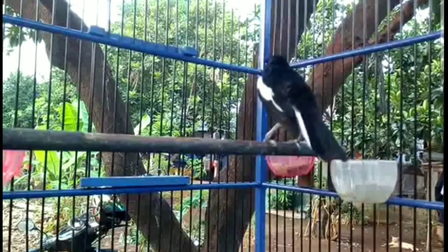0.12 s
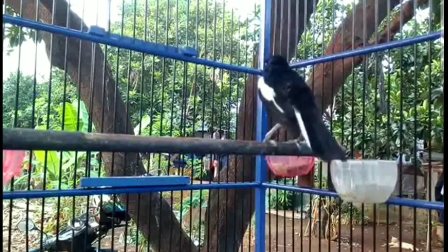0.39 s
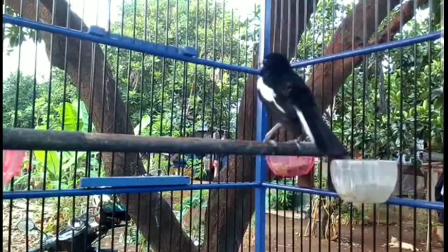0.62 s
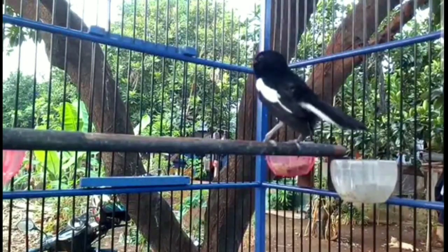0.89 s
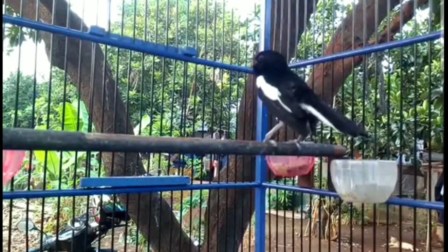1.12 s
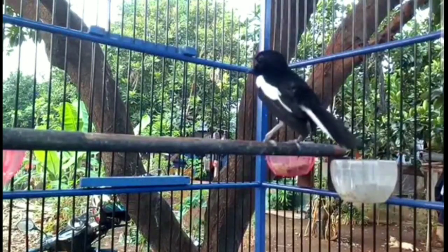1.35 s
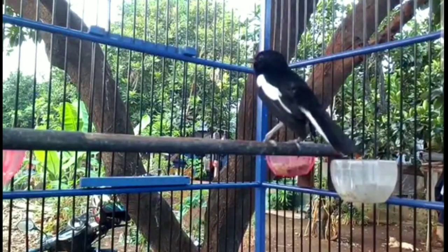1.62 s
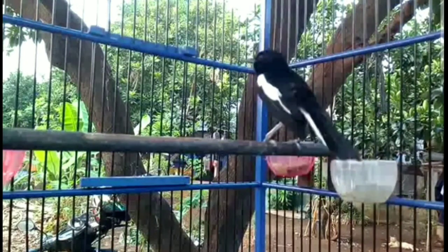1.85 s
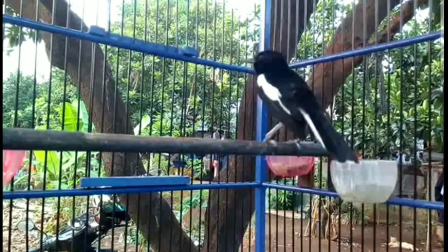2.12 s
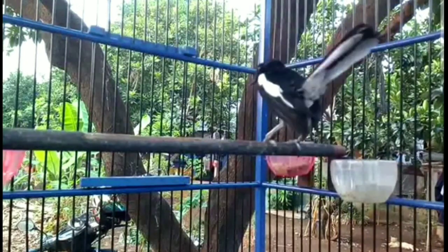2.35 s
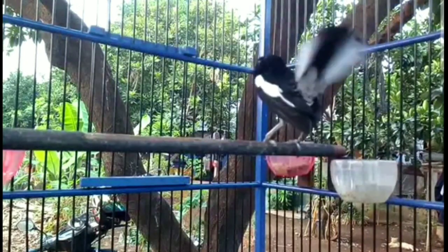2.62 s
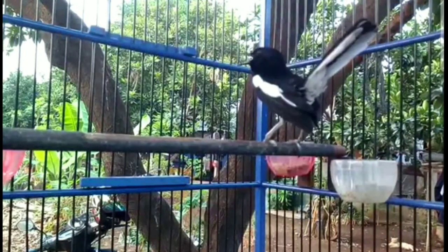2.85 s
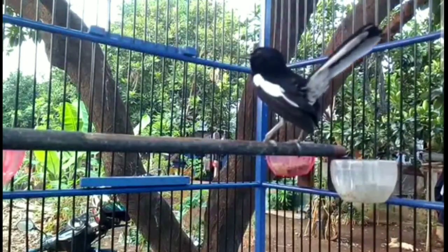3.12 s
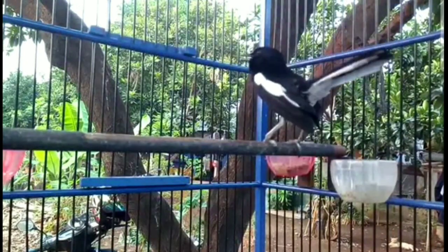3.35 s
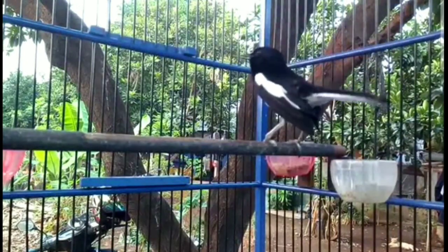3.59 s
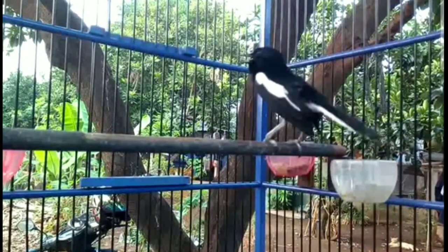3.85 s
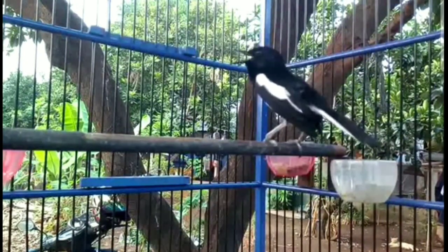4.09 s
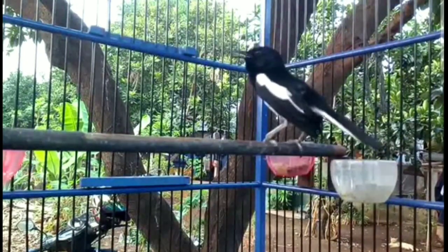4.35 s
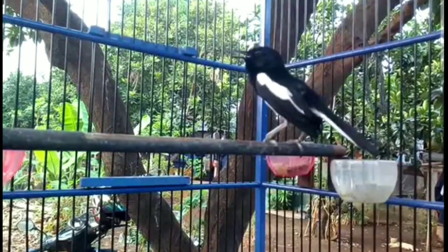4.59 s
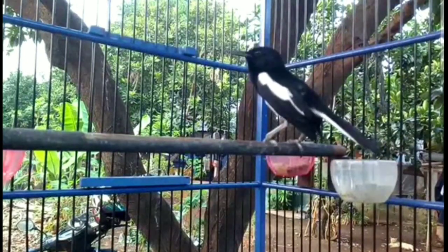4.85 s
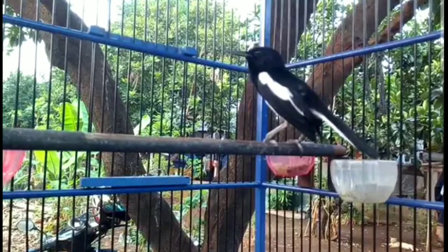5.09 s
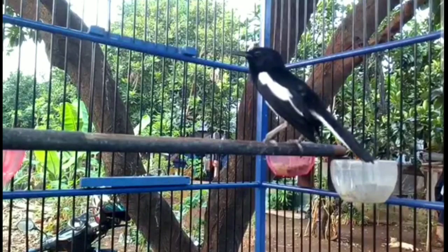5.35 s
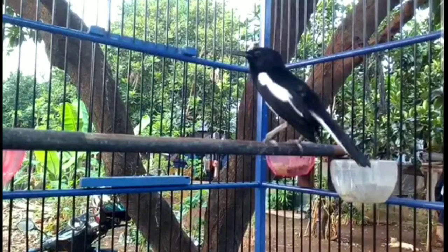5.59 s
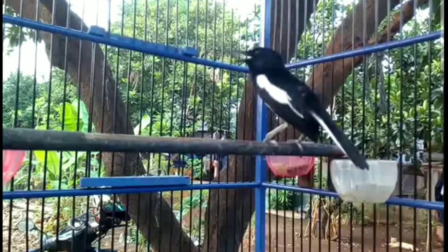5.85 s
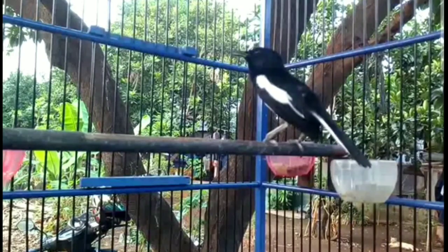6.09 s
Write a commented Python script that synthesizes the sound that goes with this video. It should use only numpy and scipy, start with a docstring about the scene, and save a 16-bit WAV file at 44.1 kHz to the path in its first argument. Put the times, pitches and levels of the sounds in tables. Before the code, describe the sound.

A caged songbird close by sings clear sliding whistles, scratchy chattering warbles and throbbing buzzes in short phrases, while fainter birds chip in a leafy yard.

```python
"""Caged songbird and yard birds

A caged songbird close to the microphone sings clear whistles, quick chattering warbles, a trill
and two-voiced buzzes: gliding sines roughened by random modulation, with rough scraps between.
Other birds whistle, call hoarsely and chip further off: fainter glides with decaying random echoes;
two short broadband clicks open chips. Beneath lie a low outdoor rumble and the hiss of a small
microphone, both shaped random spectra, and a faint steady ticking of short damped pulses."""
import sys
import numpy as np
from scipy import signal
from scipy.fft import rfft, irfft
from scipy.io import wavfile
from scipy.ndimage import uniform_filter1d

SR = 44100
rng = np.random.default_rng(int(sys.argv[2]) if len(sys.argv) > 2 else 0)


def invert_db(x):
    """Field ratio 10**(x/20) for x, a level in decibels (scalar or array-like)."""
    u = np.asarray(x, float) / 20
    return 10 ** u


def put_to_file(sound):
    """Save the sound as 16-bit audio at rate SR, in the file named by the first command-line argument."""
    columns = np.atleast_2d(sound).T  # one column per channel
    safe = np.clip(columns, -1, 1)
    whole_steps = np.round(safe * 32767)
    wavfile.write(sys.argv[1], SR, whole_steps.astype(np.int16))


N = 273861

# throbbing two-voiced buzzes, the first already ending:
# start t/s, end t/s, strength/dB, pitch factor, throb period t/s
BUZZES = [(-.17, .045, -10.5, 1.07, .029), (2.865, 3.107, -0.5, 0.99, .0292),
          (5.986, 6.179, -1.5, 1.02, .0268)]


def evened(x):
    """Normalization: scales a signal to rms 1."""
    return x / np.sqrt(np.mean(abs(x) ** 2) + 1e-20)


def read(points, hz):
    """Linear interpolation of a curve on a log-frequency axis."""
    f, value = np.transpose(points)
    return np.interp(np.log(hz + 1), np.log(f + 1), value)


def coloured(x, points):
    """Linear filtering: multiplies the spectrum by a gain curve in dB."""
    hz = np.fft.rfftfreq(len(x), 1 / SR)
    return irfft(rfft(x) * invert_db(read(points, hz)), len(x))


def waver(count, width):
    """Low-pass noise: random unsteadiness of rms 1 that holds for about width samples."""
    once = uniform_filter1d(rng.standard_normal(count), round(width))
    return evened(uniform_filter1d(once, round(width)))


def add(mix, s, sound):
    """Superposition: adds a sound at time s; what lies before zero is dropped."""
    at = round(s * SR)
    sound = sound[max(-at, 0):]
    part = mix[max(at, 0):][:len(sound)]
    part += sound[:len(part)]


def spread(rows):
    """Interpolated control curves: time, a 2 ms fade at both ends, and each column per sample."""
    s, *columns = np.transpose(rows)
    t = np.arange(s[0], s[-1], 1 / SR)
    fade = np.clip(np.minimum(t - t[0], t[-1] - t) / .002, 0, 1)
    curves = (uniform_filter1d(np.interp(t, s, c), size=40, mode="nearest") for c in columns)
    return t, fade, *curves


def angle(hz):
    """Phase is the running integral of frequency."""
    return 2 * np.pi * np.cumsum(hz) / SR


def tone(phase, db):
    """A sinusoid's peak is the square root of two times its rms level."""
    return np.sqrt(2) * invert_db(db) * np.cos(phase)


def breaks(t):
    """Amplitude modulation: Gaussian level changes, mostly brief dips where the voice breaks off."""
    # centre t/s, width t/s, level change/dB
    pauses = [(.466, 0.0044, -22), (0.772, 0.0066, -14), (6.034, 0.012, -5), (3.092, 0.005, -2),
              (1.463, 0.0063, 0), (4.218, 0.032, -1.5), (4.258, .005, -3), (4.267, 0.0033, -2),
              (4.468, 0.0097, -6), (4.489, 0.0073, 0.5), (4.704, 0.0069, -9), (4.732, 0.0047, -13),
              (4.643, .006, 0), (.669, .008, -10), (0.702, 0.0017, 0), (0.742, 0.0071, -18),
              (.751, 0.0049, -14), (.76, 0.007, -14), (0.948, 0.0026, -9), (0.954, 0.0024, -3),
              (1.175, 0.002, -2.5), (1.232, 0.0015, -16), (1.526, 0.0043, -8), (3.887, .008, -8),
              (4.561, 0.0081, -19), (4.767, 0.0028, -5), (4.79, 0.004, 0)]
    return sum(db * np.exp(-(2 * (t - s) / length) ** 2) for s, length, db in pauses)


def air():
    """Filtered Gaussian noise: rumble and hiss from random short-time spectra with drifting patches."""
    # spectral shape of rumble and hiss: f/Hz, relative density/dB
    spectrum = [(20, -49), (35, -14.5), (60, 2), (110, -3), (400, -13), (1300, -20), (4200, -24.5),
                (7300, -26.5), (16000, -26)]
    frames, hz = N // 1024 + 5, np.fft.rfftfreq(4096, 1 / SR)
    a, b, patches = rng.standard_normal((frames, 2049, 3)).T
    patches = uniform_filter1d(patches, size=60, axis=0)  # over frequency
    patches = evened(uniform_filter1d(patches, size=5, axis=1))  # over time
    z = (a + 1j * b) * invert_db(read(spectrum, hz)[:, None] + 0.42 * patches)
    noise = signal.istft(z, nperseg=4096, noverlap=3072)[1][:N]
    return invert_db(-58.5) * evened(noise)


def throb(t):
    """A sawtooth clock: where the buzz throbs (1 or 0), and how far each throb has gone (0-1)."""
    held_s = .055  # a buzz opens on a held chord
    on, done = np.zeros(len(t)), np.zeros(len(t))
    for start, end, _, _, period in BUZZES:
        turns = (t - start - held_s) / period
        inside = (turns > 0) & (turns < (end - start - held_s) // period)
        on, done = on + inside, done + inside * (turns % 1)
    return on, done


def placed(shape, start, end, db, factor):
    """Scaling of a shared shape in time, strength and pitch; negative times count from the end."""
    s, hz, level_db, upper_db = np.transpose(shape)
    return np.c_[np.where(s < 0, end, start) + s, hz * factor, level_db + db, upper_db + db]


def buzz(low, high):
    """Nonlinear mixing of two voices: a low one with strong octave, a high one, combination tones."""
    out = np.zeros(N)
    t, fade, hz, db, octave_db = spread(low)
    on, done = throb(t)
    # the pitch climbs, then snaps back; the octave breaks off at each snap
    climb = uniform_filter1d(on * (np.sin(2.22 * done) - .6), size=150)
    gap = uniform_filter1d(on * np.exp(-done / 0.13), size=90)
    a = angle(hz * (1 + 0.0916 * climb + 0.013 * waver(len(t), 100)))
    db = db - 8 * climb + 3 * waver(len(t), 150)
    octave_db = octave_db - 14 * gap + breaks(t)
    low_voice = tone(a, db) + tone(2 * a, octave_db)
    low_voice += tone(3 * a, db - 14) + tone(4 * a, octave_db - 43.5)
    add(out, t[0], fade * low_voice)

    u, fade, high_hz, db, sum_db = spread(high)
    shake = 0.011 + 0.068 * throb(u)[0]  # the high voice turns hoarse during the throbs
    a, b = np.interp(u, t, a), angle(high_hz * (1 + shake * waver(len(u), 90)))
    mixed = tone(a + b, sum_db) + tone(2 * b, sum_db - 15)
    mixed += tone(2 * a + b, sum_db - 38) + tone(3 * a - b, sum_db - 20.5)
    add(out, u[0], fade * (tone(b, db) + mixed))
    return out


def buzzes():
    """Scaled repetition: rising chirps and throbbing buzzes share their two-voice shapes."""
    # rising chirp before a buzz: start t/s, strength/dB, pitch factor
    chirps = [(2.715, -2, 1.029), (5.841, -2.5, .97)]
    # low and high sides of a chirp: t/s from start, f/Hz, level/dB, octave or sum tone level/dB
    chirp_low = [(0, 1700, -54, -85), (.009, 1750, -49.5, -43.5), (.024, 2010, -52.5, -24),
                 (.034, 2040, -78, -33), (.042, 2180, -70, -31.5), (.053, 2080, -68, -54)]
    chirp_high = [(.025, 2594, -49, -84), (.039, 2886, -38, -96), (.054, 3130, -56, -86)]
    # both sides of a buzz: t/s from start (negative: from end), f/Hz, level/dB,
    # octave or sum tone level/dB
    buzz_low = [(0, 1754, -59, -56), (.012, 1895, -50, -33.5), (.021, 1792, -57, -43),
                (.051, 1720, -56.5, -53.5), (.064, 1898, -53, -33.5), (-.012, 1874, -55, -33.5),
                (-.001, 1810, -60.5, -54)]
    buzz_high = [(.003, 2820, -47, -76), (.013, 2586, -55, -47), (.02, 2280, -48, -32.5),
                 (.047, 2270, -52.5, -32.5), (.061, 2670, -54, -54), (-.02, 2550, -49.5, -70),
                 (-.003, 2560, -53, -57)]
    out = np.zeros(N)
    for s, *row in chirps:
        out += buzz(placed(chirp_low, s, s, *row), placed(chirp_high, s, s, *row))
    for row in BUZZES:
        out += buzz(placed(buzz_low, *row[:4]), placed(buzz_high, *row[:4]))
    return out


def turbulence(voice):
    """Amplitude modulation by noise puts sidebands around each tone, which the throat filters."""
    # throat resonance applied to the sidebands: f/Hz, gain/dB
    throat = [(1000, -32.5), (1600, -17), (3500, -5.5), (4100, 9), (4700, -9), (5500, -15), (7000, -2.5),
              (9000, -43)]
    # scratchy spells: start t/s, end t/s, modulation level ahead of the throat/dB
    hoarse = [(0, .06, -0.5), (0.447, .49, 1), (0.732, .8, -1), (0.827, 1.02, -4), (1.13, 1.3, -8),
              (1.406, 1.6, -5.5), (2.708, 2.826, -14.5), (2.881, 3.11, -10.5), (3.3, 3.427, -9.5),
              (4.719, 4.84, -9.5), (5.867, 5.896, -7.5), (5.98, 6.204, -8)]
    clear_db = -38  # modulation outside these spells
    shake_shape = [(0, -24.5), (300, 6.5), (700, 0), (1500, -8), (4000, -17.0), (9000, -62.5)]  # f/Hz, dB
    shake = evened(coloured(rng.standard_normal(N), shake_shape))
    t = np.arange(N) / SR
    rasp_db = clear_db + sum((db - clear_db) * ((t >= start) & (t < end)) for start, end, db in hoarse)
    return coloured(voice * shake * invert_db(uniform_filter1d(rasp_db, size=600)), throat)


def pip(start, length, db, from_hz, to_hz):
    """A linear glide under one arch: the course of a short note, 8 dB down at its ends."""
    u = np.linspace(0, 1, num=9)
    return np.c_[start + length * u, from_hz + (to_hz - from_hz) * u, db - 8 * (2 * u - 1) ** 4]


def ticking():
    """Damped impulses: a faint dull tick at a steady pace, each of its own size."""
    # steady pace: first t/s, end t/s, spacing t/s
    ticks = (.0735, 3.9, .08)
    out, u = np.zeros(N), np.arange(200) / SR / .00025  # time in quarter milliseconds
    for s, size in zip(np.arange(*ticks), rng.random(100)):
        add(out, s, invert_db(-44 + 7 * size) * (1 - u / 3) * u * np.exp(-u))
    return out


def glide(start, length, db, from_hz, to_hz, fade_db, rise=0.18):
    """A shaped glide: gains 9 dB over the share rise of its length, while it fades ever faster."""
    u = np.linspace(0, 1, num=12)
    shape_db = -9 * np.clip(1 - u / rise, 0, 1) + fade_db * u ** 2
    return spread(np.c_[start + length * u, from_hz + (to_hz - from_hz) * u, db + shape_db])


def smeared(row):
    """Fast random frequency and amplitude modulation smears a tone into a noisy band."""
    *course, shake_hz = row
    t, fade, hz, db = glide(*course, fade_db=-15.5, rise=0.53)
    a = angle(hz + shake_hz * waver(len(t), 40))
    return t[0], fade * tone(a, db + 4 * waver(len(t), 80))


def faint_notes():
    """Slow random modulation leaves far whistles tonal; fast modulation smears notes and clicks."""
    # far birds' short dying notes: start t/s, length t/s, level ahead of the mix/dB, from f/Hz, to f/Hz
    far_notes = [(2.19, 0.055, -70, 2230, 2270), (5.03, 0.067, -69.5, 2290, 2316),
                 (.078, 0.037, -72, 5050, 4500), (1.043, 0.11, -59, 3310, 3210),
                 (1.83, .06, -70, 2760, 2760), (1.912, 0.077, -66.5, 4240, 4070),
                 (2.175, 0.091, -57.5, 4320, 4560), (2.206, 0.063, -55, 3880, 4200),
                 (2.614, 0.054, -66, 4490, 4250), (5.033, 0.088, -58, 4140, 3540),
                 (5.36, 0.097, -71, 1516, 1720), (5.456, 0.063, -59.5, 4070, 4100)]
    # far whistles held long: start t/s, length t/s, level ahead of the mix/dB, from f/Hz, to f/Hz
    far_held = [(2.215, 0.2, -59, 3428, 3433), (5.045, 0.222, -66, 3370, 3250)]
    # hoarse, smeared notes: far birds' calls, rough scraps between the near bird's notes,
    # and two short broadband clicks that open chips:
    # start t/s, length t/s, level ahead of the mix/dB, from f/Hz, to f/Hz, rms pitch shake f/Hz
    smears = [(0.111, 0.064, -54, 4130, 3800, 338), (0.871, 0.031, -44, 4490, 4290, 200),
              (1.0, .11, -46.5, 4200, 4120, 242), (1.536, 0.037, -39, 3900, 3725, 200),
              (1.567, 0.058, -39, 3996, 4315, 149), (1.642, 0.1, -54, 2725, 2790, 189),
              (1.424, 0.29, -63.5, 2025, 1970, 80), (1.668, 0.14, -55, 2343, 2380, 50),
              (2.769, 0.089, -61.5, 1950, 1700, 60), (3.104, 0.056, -48, 3864, 4100, 408),
              (3.141, 0.056, -53.5, 4570, 4950, 440), (4.759, 0.082, -53.5, 1966, 1800, 90),
              (4.947, 0.018, -58, 3500, 4060, 800), (4.959, 0.143, -59.5, 4290, 4400, 216),
              (5.209, 0.012, -53, 3530, 4200, 700), (5.22, 0.051, -58, 4200, 4550, 260),
              (5.445, 0.206, -60, 2010, 2060, 119), (1.249, 0.041, -51.5, 2580, 2950, 150),
              (5.593, 0.11, -64, 2056, 2400, 120), (5.668, 0.15, -54, 2573, 2236, 100),
              (5.926, 0.078, -48, 4190, 4150, 303)]
    out = np.zeros(N)
    # fade over the note, and level of the tone an octave below, in dB
    for rows, fade_db, under_db in [(far_notes, -6, -29.5), (far_held, 0, -16)]:
        for row in rows:
            t, fade, hz, db = glide(*row, fade_db)
            a = angle(hz * (1 + 0.011 * waver(len(t), 120)))
            db = db + 3 * waver(len(t), 500)
            add(out, t[0], fade * (tone(a, db) + tone(a / 2, db + under_db)))
    for row in smears:
        add(out, *smeared(row))
    return out


def whistle(rows, quavers=()):
    """Nearly sinusoidal phonation: the faint octave weakens further as the pitch rises."""
    t, fade, hz, db = spread(rows)
    for crest, period, depth_hz, dip_db, lag in quavers:
        turn = (t - crest) / period
        on = (t[0] < crest < t[-1]) * np.clip(2 * turn + 1.47, 0, 1)
        # sharp crests, round troughs
        hz = hz + on * depth_hz * (1.27 - 2 * abs(np.sin(np.pi * turn)))
        db = db - on * dip_db * (1.27 - 2 * abs(np.sin(np.pi * (turn - lag))))
    a = angle(hz * (1 + 0.0033 * waver(len(t), 200)))
    db = db + breaks(t) + 0.45 * waver(len(t), 250)
    octave_db = db - 37.5 - 8 * (hz / 3000) ** 2 + 4 * waver(len(t), 300)
    return t[0], fade * (tone(a, db) + tone(2 * a, octave_db) + tone(3 * a, db - 48.5))


def warble(rows, effort_db):
    """Resonance favours a fast, trembling sweep near 4 kHz and lifts its octave at low pitch."""
    # throat gain on the tone: f/Hz, gain/dB
    favour = [(2200, -30.5), (2700, -14), (3400, -11.5), (3700, -10), (4000, 1), (4400, -3), (4800, -11),
              (5400, -14.5), (6300, -26.5)]
    # throat gain on the octave, by pitch: f/Hz, octave level against the tone/dB
    octave = [(2200, 24.5), (2600, -1.5), (3300, -18), (4000, -42.5), (6500, -8.5)]
    t, fade, hz = spread(rows)
    hz = uniform_filter1d(hz, size=100, mode="nearest")
    late = np.clip((t - t[0]) / .12, 0, 1)
    # with time the effort sags and the octave dies
    db = effort_db + read(favour, hz) + breaks(t) - 4.5 * late ** 4
    a = angle(hz * (1 + 0.029 * waver(len(t), 60)))
    tremble_db = 3 * waver(len(t), 64)
    octave_db = db + read(octave, hz) + tremble_db - 35 * late ** 3
    voice = tone(a, db + 0.45 * tremble_db) + tone(2 * a, octave_db) + tone(3 * a, db - 35)
    return t[0], fade * voice


def chips():
    """Fast frequency modulation: another bird's chip rises a little, then falls below its pitch."""
    # short high chips: t/s, level ahead of the mix/dB, nominal f/Hz
    chip_rows = [(1.811, -52, 5550), (1.845, -51, 5550), (3.7443, -34, 5700), (4.1228, -35, 5600),
                 (4.3352, -32, 5830), (4.5223, -39, 5830), (4.7265, -38, 5410), (4.9537, -33.5, 5760),
                 (5.217, -33.5, 5370), (5.682, -34.5, 5770), (5.9554, -43, 5830)]
    out, u = np.zeros(N), np.linspace(0, 1, round(0.0103 * SR))
    for s, db, hz in chip_rows:
        sweep = angle(hz * (1.06 - 0.16 * abs(u - .35)))
        add(out, s, tone(sweep, db) * np.sin(np.pi * u) ** .5)
    return out


def trill():
    """Frequency modulation with a slowing flutter; the level dips near the bottom of each swing."""
    start_s, length_s, release_s = 4.141, 0.2, 0.012
    t = np.arange(0, length_s, 1 / SR)
    fade = np.clip(np.minimum(t / .002, (length_s - t) / release_s), 0, 1)
    hz = np.linspace(3746, 3119, len(t))
    db = -29.5 - 4.5 * t / length_s + breaks(t + start_s)
    depth_hz = 170 * np.clip(1 - (t / 0.18) ** 1.3, 0, 1)  # shrinks to nothing
    s = t + .0065
    swing = 2 * np.pi * 113 * s * (1 - (s / .251) ** 2 / 3)  # from 113 Hz, slowing towards a stall
    a = angle(hz + depth_hz * np.cos(swing))
    db = db + depth_hz / 40 * (np.cos(swing - .3) - 0.61 * np.cos(2 * swing - .6))
    return start_s, fade * (tone(a, db) + tone(2 * a, db - 39.5) + tone(3 * a, db - 45))


def songbird():
    """Superposition of the near bird's pitched notes, then turbulence acting on their sum."""
    # clear whistles, one list each: t/s, f/Hz, level/dB
    whistles = [
        [(.193, 3300, -36), (.221, 3100, -28.5), (.275, 3175, -31), (.285, 3430, -27.5), (.29, 3670, -37.5),
         (.296, 3790, -26.5), (.321, 3945, -22), (.405, 3954, -23), (.424, 4038, -18.5), (.433, 4340, -29.5)],
        [(3.418, 2400, -35), (3.426, 2302, -36), (3.48, 2593, -30), (3.487, 2550, -63)],
        [(3.503, 3320, -49), (3.515, 3340, -34), (3.532, 3385, -34), (3.538, 3693, -32.5), (3.545, 3340, -31.5),
         (3.556, 3500, -34.5), (3.564, 3350, -33.5), (3.57, 3420, -48)],
        [(3.562, 2890, -32.5), (3.579, 2800, -30), (3.655, 2751, -28), (3.675, 2880, -49.5)],
        [(3.808, 2193, -51.5), (3.835, 2370, -35), (3.888, 2550, -30.5), (3.895, 2636, -29.5),
         (3.94, 2944, -30), (4.0, 2880, -31.5), (4.006, 2930, -44)],
        [(4.432, 2226, -52), (4.456, 2240, -36), (4.507, 2455, -32.5), (4.55, 2576, -30), (4.562, 2525, -27),
         (4.58, 2630, -29), (4.586, 2620, -66)],
        [(4.628, 5050, -31), (4.633, 5400, -72), (4.638, 4080, -23.5), (4.644, 3300, -38.5), (4.653, 3870, -25),
         (4.665, 3345, -35), (4.7, 3250, -33), (4.72, 3060, -35.5), (4.765, 2760, -35), (4.81, 2440, -35),
         (4.83, 2360, -51)],
    ]
    # quavering of a whistle: first crest t/s, period t/s, half swing f/Hz, half level swing/dB,
    # level lag/periods
    quavers = [(3.8325, .0316, 91.5, 1, -0.17), (4.457, .028, 60.4, 1.5, 0.36),
               (4.722, 0.023, 149, 2.5, 0.016)]
    # short pips and flicks: start t/s, length t/s, top level/dB, from f/Hz, to f/Hz
    pips = [(0, 0.032, -46.5, 2793, 2576), (.434, 0.006, -39, 4530, 4530), (0.733, 0.05, -57.5, 2324, 1685),
            (1.253, 0.026, -60, 1810, 1690), (1.526, .009, -30.5, 4240, 3580),
            (1.549, 0.021, -53.5, 1900, 1730), (3.304, .017, -60, 3040, 3030),
            (3.313, .024, -43.5, 1904, 1720), (3.341, 0.027, -42, 1613, 1960),
            (3.363, 0.015, -55, 2800, 2410), (3.371, 0.013, -42.5, 1640, 1930),
            (3.379, .009, -46, 2230, 2440), (3.385, 0.0098, -41.5, 1950, 1720),
            (3.391, 0.0065, -50, 2650, 3060), (3.396, 0.0073, -42, 1720, 1860),
            (3.402, 0.0062, -34, 2410, 2610), (3.407, .011, -44.5, 1910, 2090),
            (4.597, 0.014, -29, 2950, 2520), (4.718, 0.015, -37, 2340, 2290),
            (6.166, .028, -52.5, 1840, 1745), (6.173, 0.021, -41.5, 3700, 3520)]
    # chattering warbles, one pitch path each: t/s, f/Hz
    warbles = [
        [(.443, 4740), (.448, 5810), (.459, 6150), (.466, 5400), (.47, 3950), (.478, 2925)],
        [(.623, 2750), (.63, 3446), (.641, 2063), (.655, 3400), (.675, 3650), (.689, 3936), (.697, 4450),
         (.704, 4435), (.711, 6120), (.724, 6455), (.736, 5910), (.746, 4224), (.76, 4410), (.768, 3800),
         (.778, 3306)],
        [(.852, 2710), (.86, 2304), (.869, 3130), (.877, 2240)],
        [(.894, 2700), (.9, 3123), (.909, 2670), (.915, 3400), (.933, 2570), (.946, 4110), (.96, 4690),
         (.964, 5260), (.968, 4260), (.975, 4280), (.981, 3040), (1.008, 2665)],
        [(1.138, 2550), (1.148, 3760), (1.159, 2620), (1.168, 3350), (1.177, 4250), (1.19, 5100), (1.199, 5530),
         (1.218, 6500), (1.228, 5360), (1.234, 5830), (1.241, 4650), (1.252, 4180), (1.264, 3720),
         (1.272, 3560)],
        [(1.423, 2650), (1.431, 4520), (1.441, 2693), (1.449, 2485), (1.457, 3354), (1.468, 3350),
         (1.478, 4064), (1.492, 4360), (1.499, 5550), (1.511, 5080), (1.517, 5500), (1.532, 3680),
         (1.536, 2810)],
    ]
    # effort of each warble ahead of the throat gain: level/dB
    efforts = [-34, -26.5, -32, -30, -30.5, -30.5]
    out = buzzes()
    for row in pips:
        add(out, *whistle(pip(*row)))
    for rows in whistles:
        add(out, *whistle(rows, quavers))
    for rows, effort_db in zip(warbles, efforts):
        add(out, *warble(rows, effort_db))
    add(out, *trill())
    return out + turbulence(out)


def yard(x, delay=0.0098):
    """Reverberation as convolution: sparse echoes of random sign, each band with its own decay."""
    # reverberation time: f/Hz, t60 t/s
    decay = [(3000, 0.21), (4200, 0.3), (6000, 0.17), (9000, 0.36)]
    taps = np.zeros(SR // 2)
    at = np.arange(round(delay * SR), len(taps) - 20, 20)
    taps[at + rng.integers(0, 20, len(at))] = rng.choice([-1., 1.], len(at))
    hz, t, z = signal.stft(taps, SR, nperseg=256)
    t60 = np.maximum(read(decay, hz), .02)[:, None]
    tail = signal.istft(z * invert_db(-60 * t / t60), SR, nperseg=256)[1]
    return signal.fftconvolve(x, tail / np.linalg.norm(tail))[:N]


def scene():
    """Direct-to-reverberant balance: near bird mostly direct, chips mostly echo,
    faint notes with clear echo, about half the amplitude of their direct sound."""
    # colour of the near bird's echo from cage and wall: f/Hz, gain/dB
    echo_colour = [(3000, 0), (4100, -1.5), (5000, 1), (7000, 8)]
    near, faint, chip = songbird(), faint_notes(), chips()
    echoes = invert_db(-12.5) * coloured(yard(near), echo_colour)
    echoes += invert_db(-4.5) * yard(faint) + invert_db(-7) * yard(chip, delay=.002)
    direct = near + invert_db(2.0) * faint + invert_db(-19) * chip
    return (direct + echoes + air() + ticking())[None]


def top_cut(x):
    """Nothing passes above the cut-off."""
    return signal.sosfilt(signal.butter(12, 16600, fs=SR, output="sos"), x)


def record(dry):
    """Band limitation: a steep linear-phase low-pass at 15520 Hz."""
    edge = signal.firwin(1023, 15520, window=("kaiser", 9), fs=SR)
    mix = signal.oaconvolve(dry, edge[None], "same")
    return top_cut(mix)


dry = scene()
out = record(dry)
put_to_file(out)
```